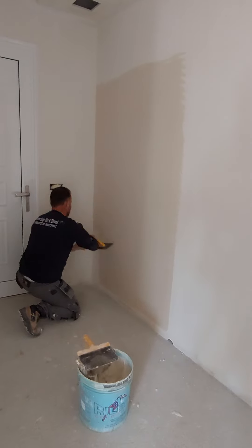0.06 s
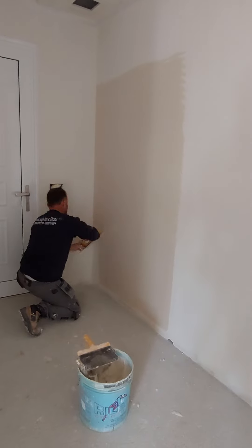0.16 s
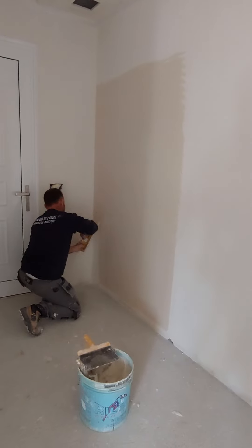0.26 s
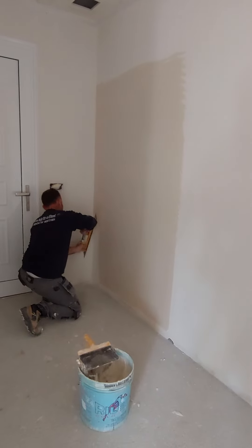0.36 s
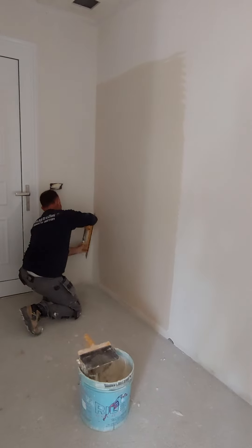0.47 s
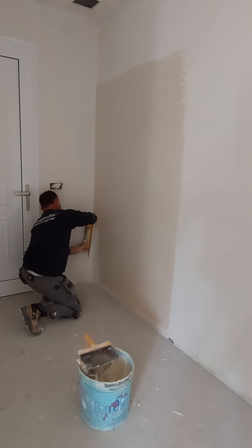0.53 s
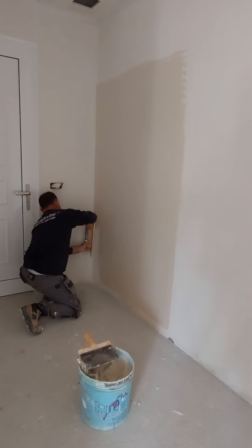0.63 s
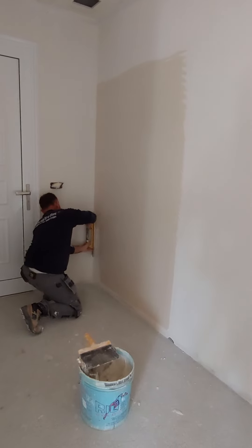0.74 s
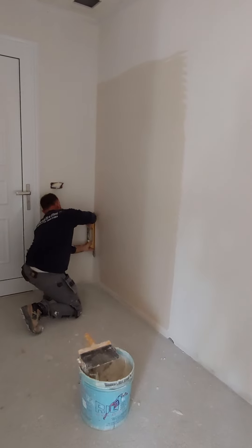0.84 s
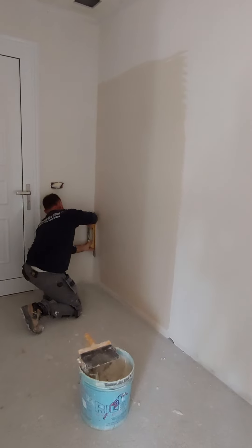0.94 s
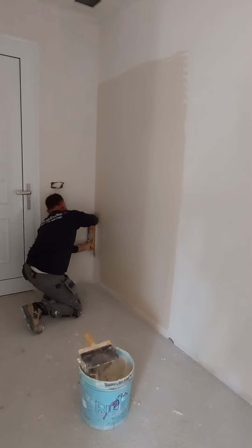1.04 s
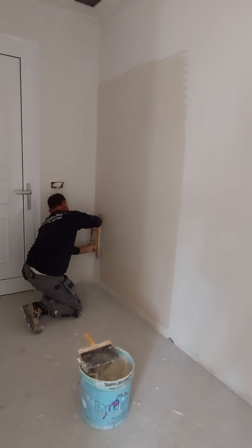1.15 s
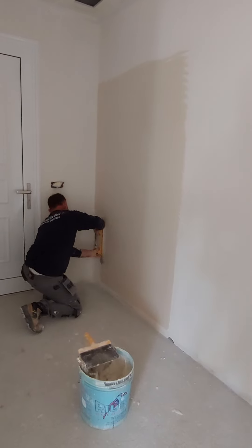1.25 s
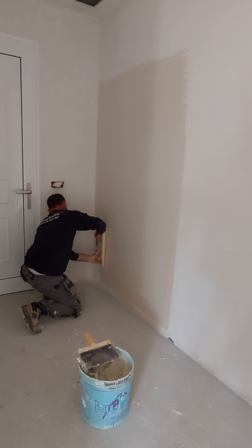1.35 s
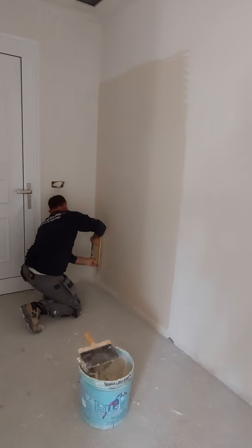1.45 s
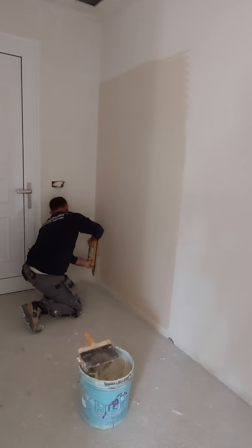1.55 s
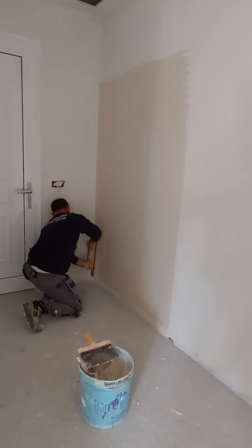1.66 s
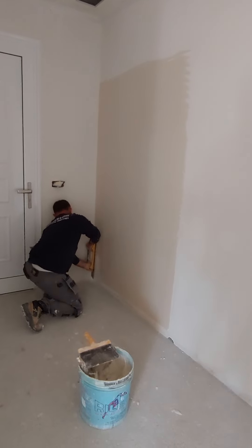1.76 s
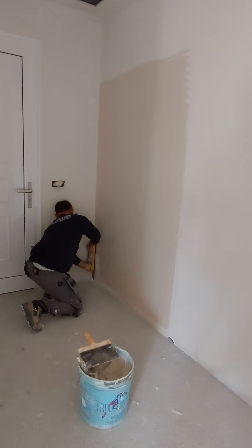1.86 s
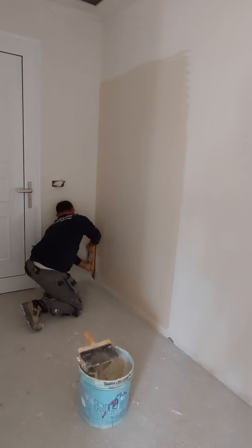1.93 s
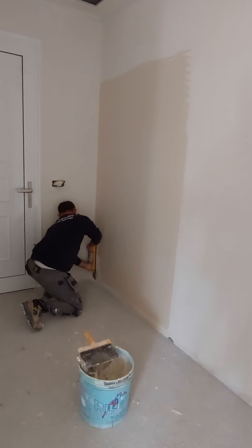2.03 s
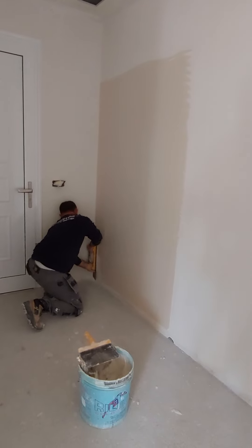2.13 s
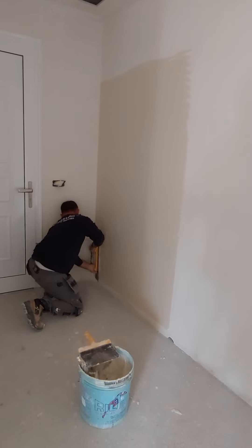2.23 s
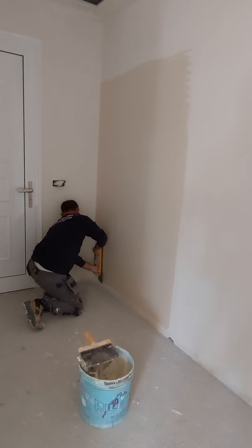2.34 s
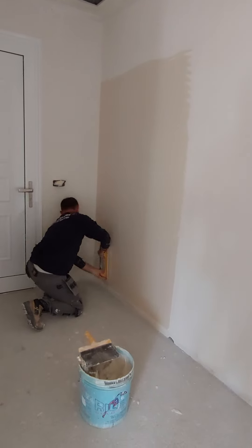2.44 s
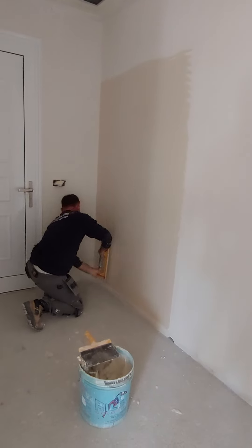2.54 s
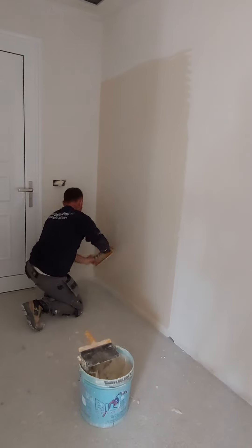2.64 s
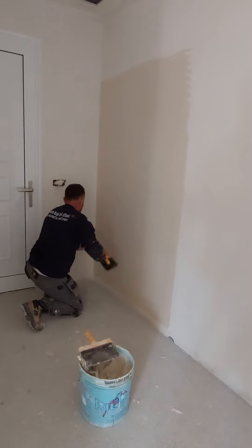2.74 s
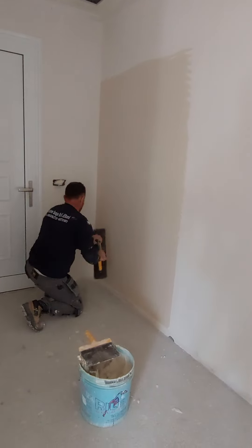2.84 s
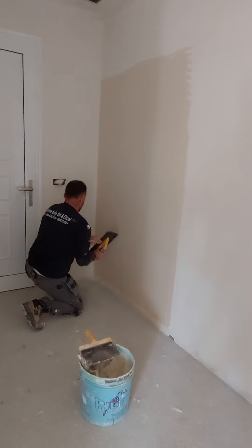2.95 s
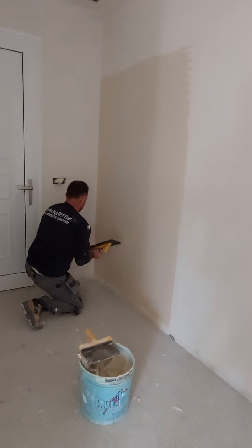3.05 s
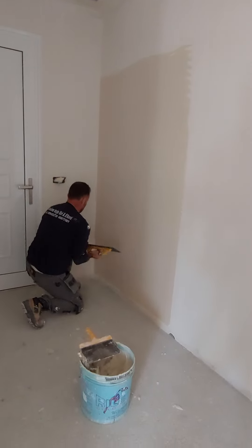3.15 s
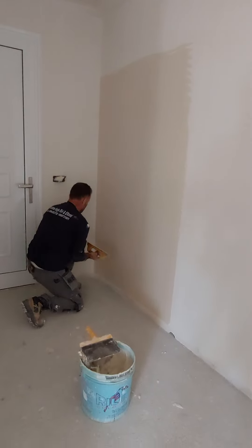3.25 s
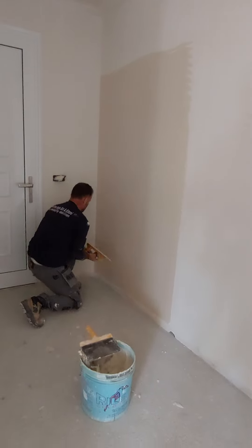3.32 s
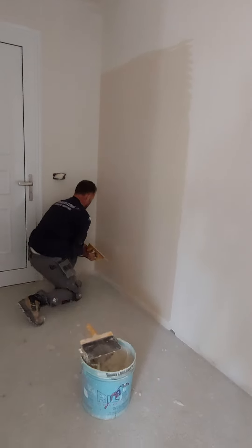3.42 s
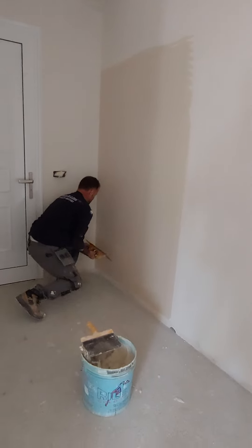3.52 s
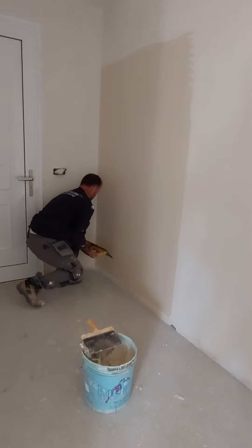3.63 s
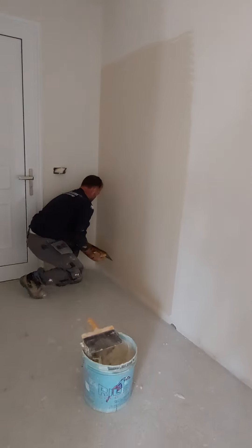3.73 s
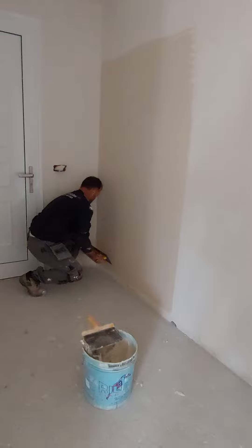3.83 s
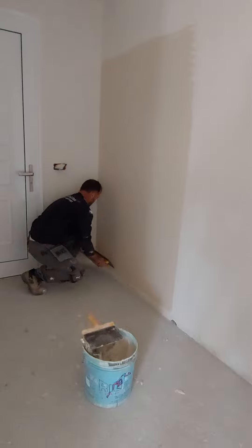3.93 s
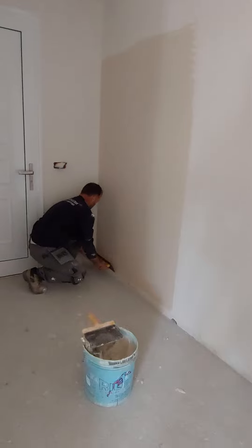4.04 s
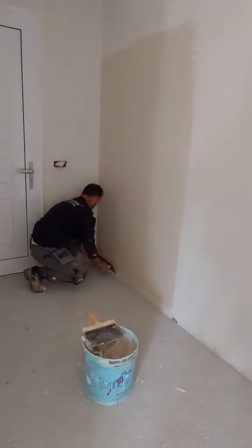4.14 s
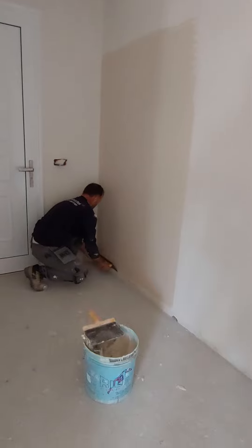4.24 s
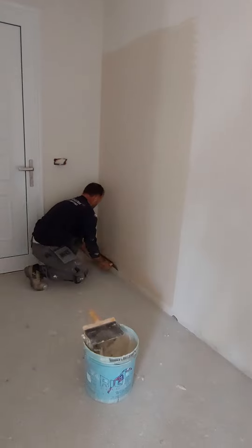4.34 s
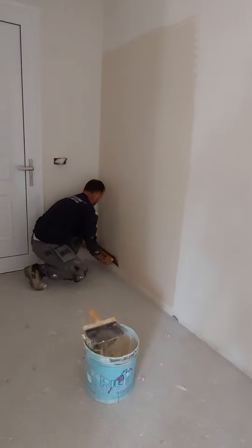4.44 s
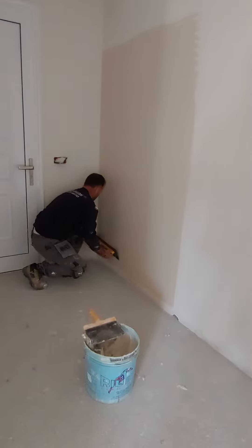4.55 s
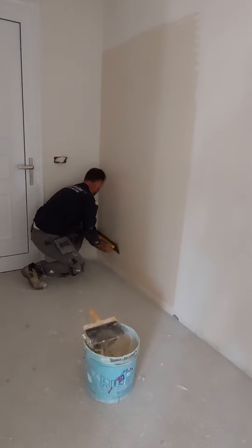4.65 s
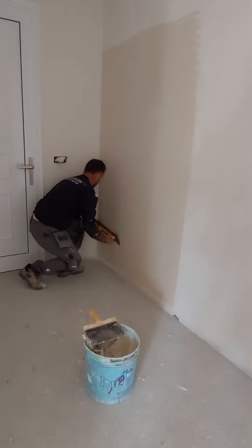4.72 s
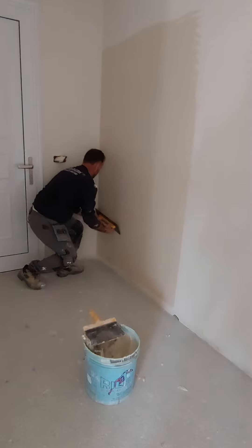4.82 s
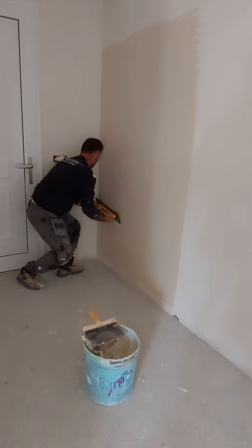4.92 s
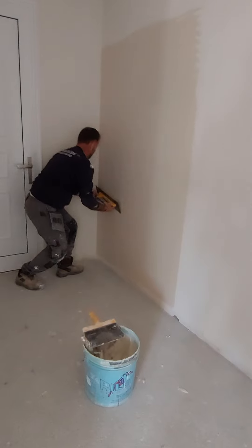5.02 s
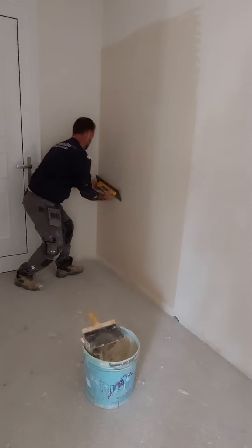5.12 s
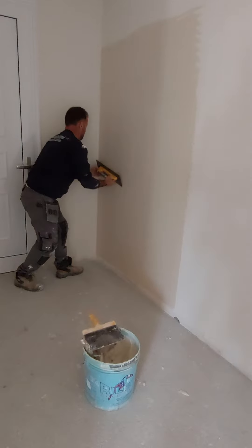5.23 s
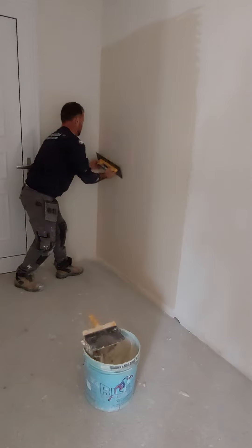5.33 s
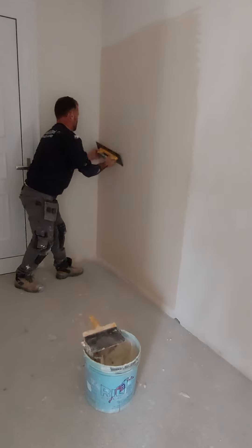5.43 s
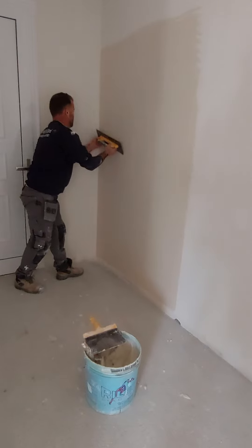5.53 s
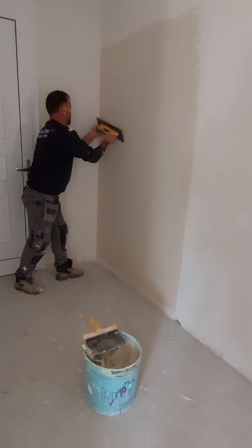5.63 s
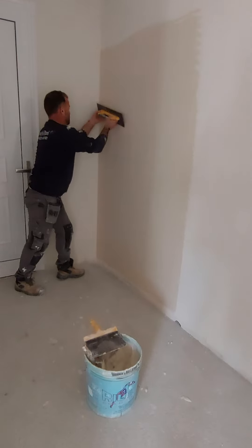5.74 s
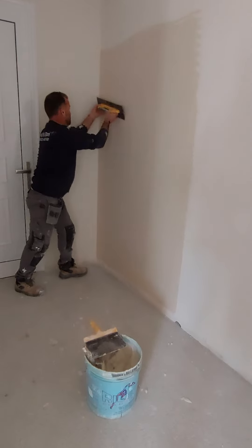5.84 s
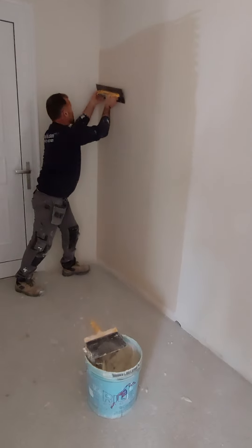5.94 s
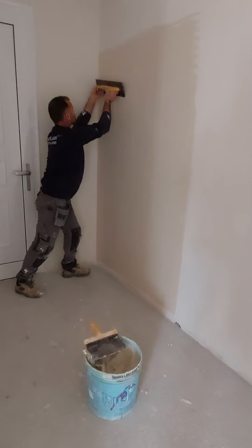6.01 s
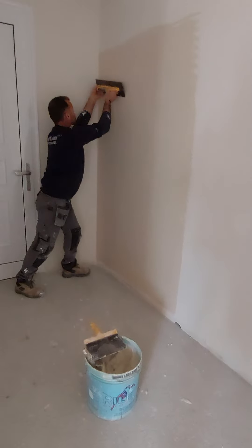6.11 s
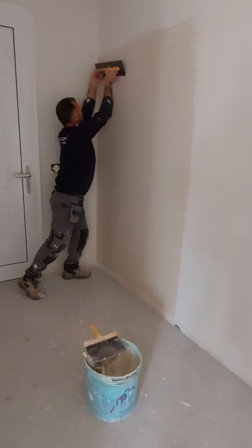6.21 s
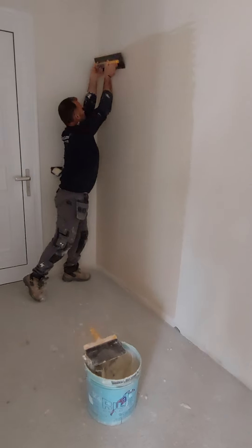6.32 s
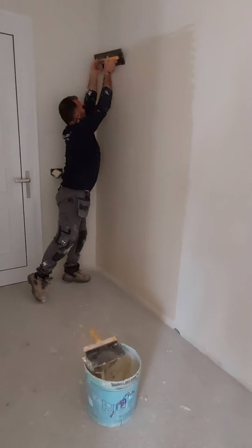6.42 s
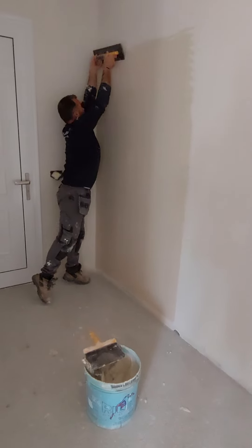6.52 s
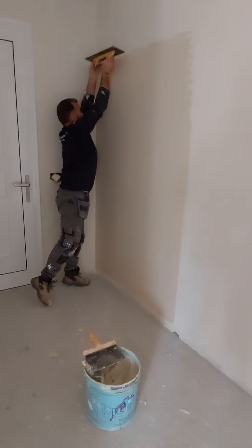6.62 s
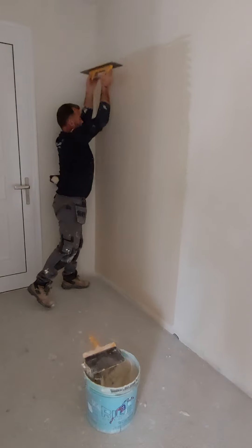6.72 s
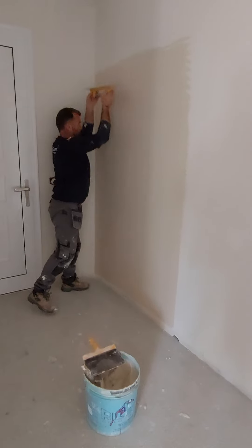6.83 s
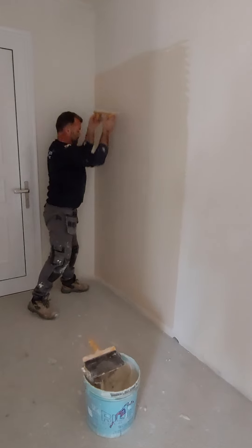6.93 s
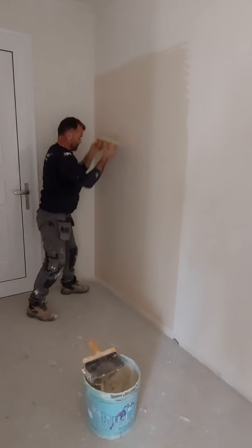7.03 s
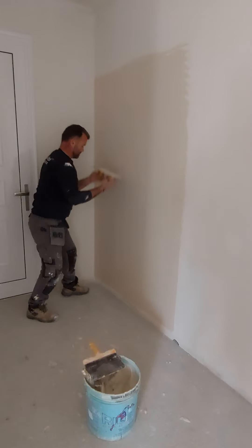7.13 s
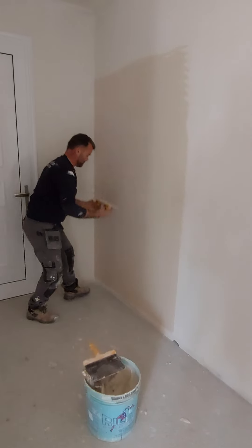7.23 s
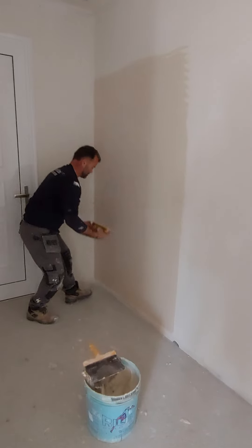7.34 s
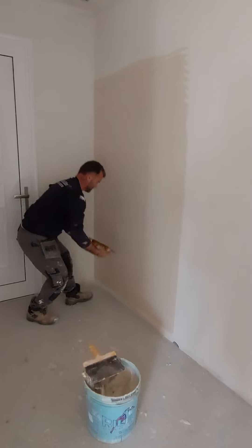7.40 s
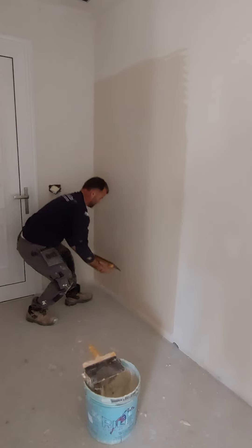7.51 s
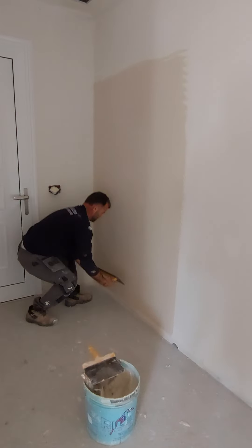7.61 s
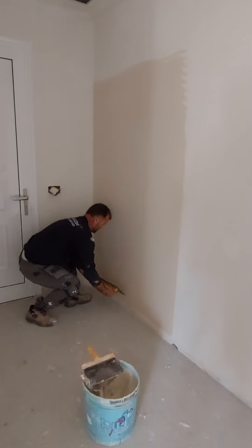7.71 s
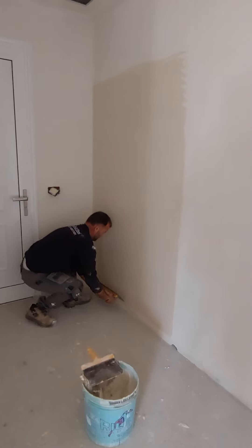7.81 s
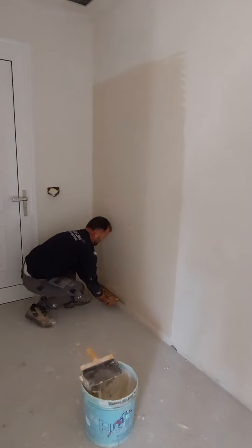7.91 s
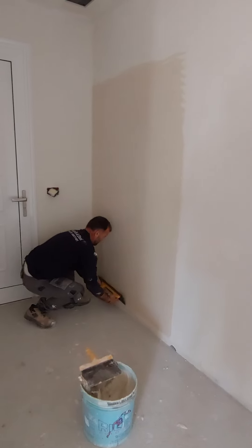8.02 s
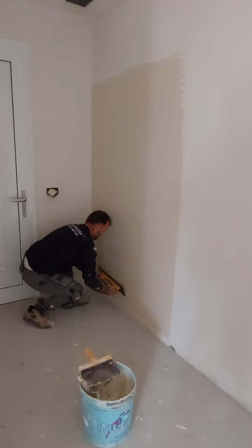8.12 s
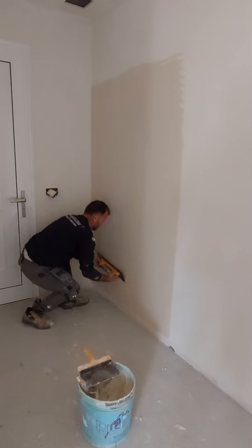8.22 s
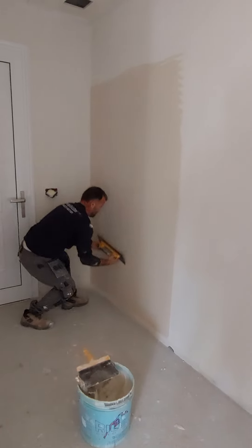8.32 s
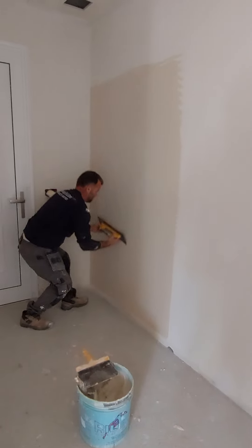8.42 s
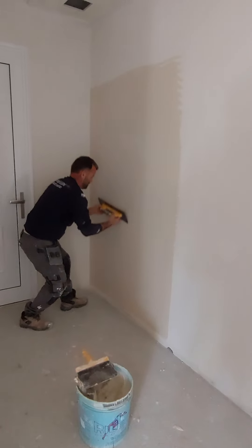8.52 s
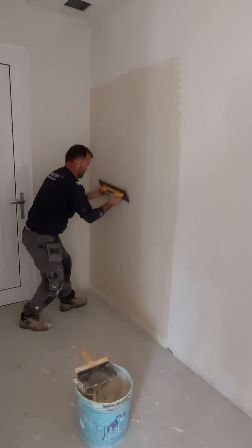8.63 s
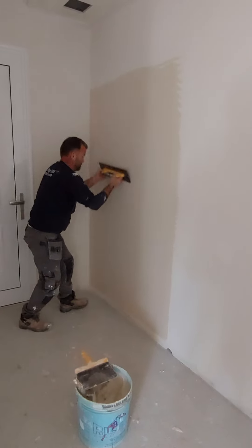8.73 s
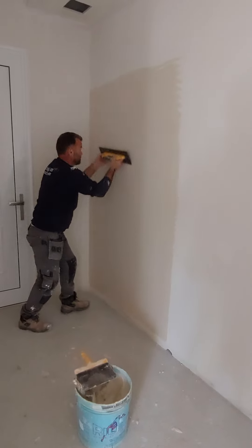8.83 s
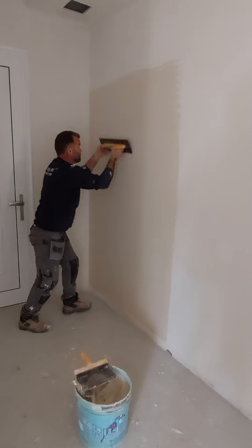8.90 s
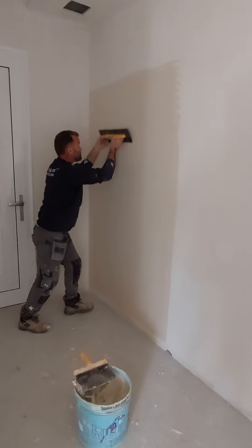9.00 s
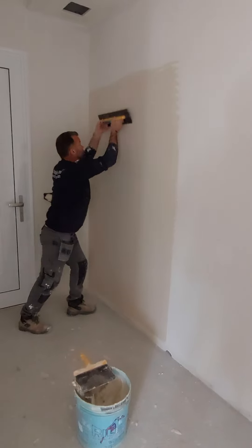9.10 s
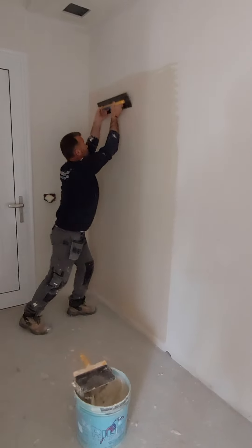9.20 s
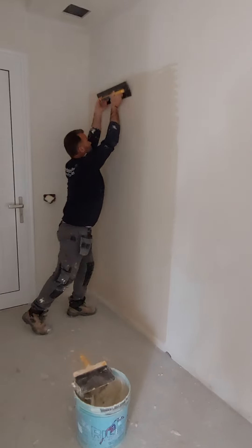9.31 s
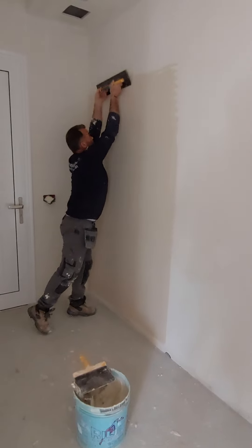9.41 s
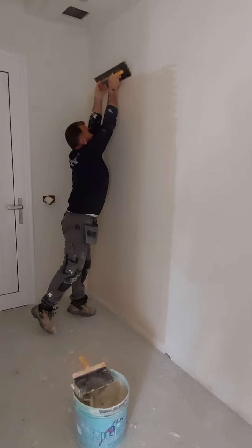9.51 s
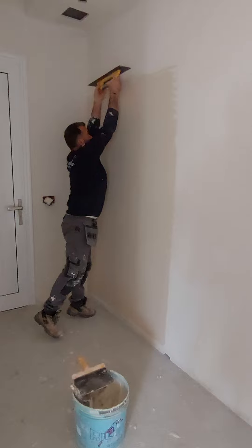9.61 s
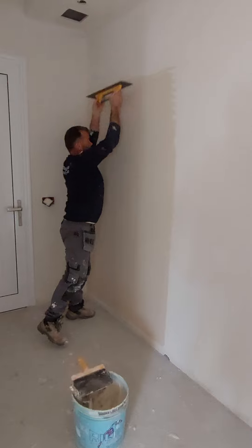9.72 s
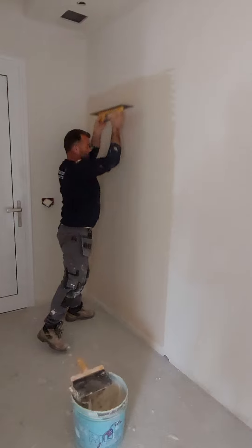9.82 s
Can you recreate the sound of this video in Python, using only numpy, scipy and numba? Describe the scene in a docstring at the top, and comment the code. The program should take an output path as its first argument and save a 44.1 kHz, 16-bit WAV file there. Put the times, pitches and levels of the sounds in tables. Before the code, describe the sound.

In a bare, hard-walled room, a wide steel blade claps against a wall, makes short gritty drags and flicks off wet filler. Shoes and clothes shuffle while a faint bird whistles. A long hollow rasp follows, then a shorter scrape, footsteps, another slap and a rising scrape ending in a loud metallic flick. The microphones are a few metres away, with strong echoes.

```python
"""Shoes and knees shift in a bare, echoing room; a wide steel blade slaps, drags and flicks over wet filler.
A faint bird calls, over a low background that slowly swells. The microphones stand a few metres away.
Blade, wall board and wet paste are filters rung by tiny random slips; so are floor and clothes.
The bird is noise through a narrow moving resonance, and dense echoes make the room."""
import sys
import numpy as np
from scipy import signal
from scipy.fft import rfft, irfft
from scipy.io import wavfile
from numba import njit

SR = 44100
rng = np.random.default_rng(int(sys.argv[2]) if len(sys.argv) > 2 else 0)


def to_wav(sig):
    """Store sig (one row per channel, or 1-D mono) as 16-bit WAV at the path in sys.argv[1].

    Samples outside -1..1 are clipped; the rate is SR.
    """
    pcm = np.clip(np.atleast_2d(sig), -1, 1) * 32767
    pcm = np.round(pcm).astype(np.int16)
    wavfile.write(sys.argv[1], SR, pcm.T)  # frames by channels


N = 434826
T = np.arange(N) / SR
FREQS = np.fft.rfftfreq(N, 1 / SR)
SPOTS = 4  # places along a wide body that sound on their own

# pushes of the blade: start/s, end/s, attack/s, starting effort/dB, effort change/dB per s,
# wall drumming re effort/dB, wet hiss re effort/dB, bend/Hz, starting bend over the broad rasp/dB
PUSHES = [(1.056, 1.317, .02, -36.5, -44.5, 8, -15, 690, -2),
          (2.16, 2.386, .02, -41, -22, -4.5, -38, 697, 3.5),
          (4.363, 6.044, 0.18, -21.5, -1.5, -15.5, -20.5, 585, -4),
          (6.091, 6.615, 0.1, -25.5, -5, -10, -22, 614, 17.5),
          (8.035, 8.254, 0.013, -27, -75, -13, -29.5, 722, 32),
          (8.213, 9.509, 0.39, -40, 2.5, -20.5, -9.5, 491, -7.5)]
# blade set on the wall: t/s, level/dB, landing/s, chatter decay/s, wall drumming re blow/dB,
# wet hiss re blow/dB, bend/Hz, bend over the broad clang/dB
BLADE_SLAPS = [(.833, -29.5, .001, 0.18, -25, -31, 690, 16),
               (.903, -18.5, 0.00016, 0.0051, -15.5, -48.5, 705, 5),
               (1.049, -31, 0.0027, 0.0024, 0.5, -17.5, 690, -11),
               (1.98, -22.5, 0.004, 0.014, -25, -34, 716, 12),
               (2.02, -12, 0.0013, 0.0018, -15, -23, 707, 2),
               (2.426, -37.5, .001, 0.0057, -15, -14.5, 724, -1),
               (4.362, -26, 0.0068, .015, -10.5, -28, 509, 5),
               (8.006, -34.5, 0.00088, 0.0026, -13.5, -29, 680, 19.5),
               (8.024, -24, 0.0031, .025, -14.5, -22.5, 473, 14)]
# blade speeding up, catching or peeling off the paste: peak t/s, level/dB, rise/s, fall/s,
# wall drumming re flick/dB, wet hiss re flick/dB, bend/Hz, bend over the broad clang/dB
BLADE_FLICKS = [(1.392, -20.5, .017, 0.0083, -20.5, -18, 497, -9),
                (2.21, -41, .02, .012, -7, -13, 722, -1.5),
                (2.503, -18.5, 0.0048, 0.0084, -42, -17, 903, 6.5),
                (4.573, -19, 0.032, 0.044, -11.5, -17.5, 659, 9.5),
                (5.051, -18, 0.026, 0.16, -10, -26.5, 636, -17),
                (5.68, -24, .04, 0.026, -21.5, -10, 522, 3.5), (6.64, -25, 0.06, 0.021, -10.5, -18, 523, 5),
                (8.78, -32.5, 0.027, .014, -22.5, -10.5, 544, -17),
                (9.619, -10, .031, 0.009, -25.5, -19.5, 406, 4)]


def amp(db):
    """Decibels to gain."""
    return 10 ** (np.asarray(db) / 20)


def read(points, hz=FREQS):
    """A spectrum table joined on a log-frequency axis."""
    f, value = np.transpose(points)
    return np.interp(np.log(np.maximum(hz, 1)), np.log(f), value)


def body(points, lo, hi, modes=(), size=8192):
    """Minimum-phase response of a broad spectrum plus resonances, with unit power between lo and hi."""
    hz = np.fft.rfftfreq(size, 1 / SR)
    # folding the cepstrum forward puts the energy as early as it can be
    cepstrum = irfft(np.log(amp(read(points, hz))))
    cepstrum[1:size // 2] *= 2
    cepstrum[size // 2 + 1:] = 0
    resonances = sum(amp(db) / (1 + 2j * (hz - f) / width) for f, width, db in modes)
    h = np.exp(rfft(cepstrum)) * (1 + resonances)
    in_band = (hz > lo) & (hz < hi)
    return irfft(h / np.sqrt(np.mean(abs(h) ** 2 * in_band)))


def ring(force, response):
    """Each slip falls on one of several spots of a wide body and rings it; one row per spot."""
    hit = rng.integers(SPOTS, size=N) == np.arange(SPOTS)[:, None]
    shares = (force * hit).astype(np.float32)
    return signal.oaconvolve(shares, response[None].astype(np.float32), axes=1)[:, :N]


@njit
def bandpass(x, hz, width):
    """State-variable resonance whose centre and width can move."""
    y, band, low = np.empty(len(x)), 0., 0.
    for i in range(len(x)):
        g, damping = np.tan(np.pi * hz[i] / SR), width[i] / hz[i]
        v = (band + g * (x[i] - low)) / (1 + g * (g + damping))
        band, low, y[i] = 2 * v - band, low + 2 * g * v, damping * v
    return y


def walk(rate):
    """Random wander with a spread a little under 1: straight lines between rate new values a second."""
    return np.interp(T * rate, np.arange(N // 20), rng.standard_normal(N // 20))


def grit(rate, spread_db):
    """Tiny slips of uneven size, about rate a second, rms 1."""
    slips = (rng.random(N) < rate / SR) * rng.choice([-1, 1], N)
    x = slips * amp(spread_db * np.clip(rng.standard_normal(N), -2, 2))
    return x / np.std(x)


def burst(texture, s, rise, fall):
    """A swell of texture with the energy of a twentieth of a second at 0 dB."""
    x = np.zeros(N)
    near = slice(max(int(s * SR) - SR // 2, 0), int(s * SR) + SR // 2)
    x[near] = texture[near] * np.exp(-np.maximum((s - T[near]) / rise, (T[near] - s) / fall))
    return x * np.sqrt(SR / 20 / np.sum(x[near] ** 2))


def background(level_db=-68, swell_db=1.4):
    """Filtered noise, alike in the bass at both microphones, whose level slowly wanders."""
    # relative spectrum: f/Hz, level/dB
    air_colour = [(25, -3.5), (60, 10.5), (130, 6.5), (400, -4), (1000, -1), (2100, -4.5), (2900, -24.5),
                  (4000, -4.5), (6000, -12.5), (9000, -18), (12000, -9), (16000, -21.5)]
    noise = rng.standard_normal((2, N))
    air = pair(signal.oaconvolve(noise, body(air_colour, 0, SR)[None], axes=1)[:, :N])
    return air * amp(level_db + swell_db * walk(2.1))


def footsteps(heel=0.053):
    """Shoes and knees land with a knock, thud and scuff on the dusty floor."""
    # contacts with the floor: t/s, thud level/dB, decay/s, scuff re thud/dB
    steps = [(.0, -56.5, 0.045, 9), (0.186, -72, .013, 16.5), (0.319, -60.5, 0.03, -4),
             (3.089, -56, .017, -2), (3.218, -61, 0.3, 10), (3.755, -52.5, .007, 6.5),
             (3.848, -50, 0.018, -0.5), (6.987, -39.5, 0.0088, -23.5), (7.041, -42, 0.0021, -8),
             (7.391, -47, 0.14, -3.5), (7.8, -60, .086, -3), (8.03, -42.5, 0.083, -14),
             (9.188, -43.5, 0.03, -28.5)]
    # relative spectrum of the floor's thud: f/Hz, level/dB
    thud_colour = [(30, -26.5), (75, -15), (95, -13), (125, 2.5), (200, -4.5), (300, 1.5), (450, -9),
                   (900, -11), (4000, -62)]
    # relative spectrum of the dusty scuff: f/Hz, level/dB
    scuff_colour = [(100, -50.5), (450, 3.5), (1000, 4), (2200, -2), (4500, -14.5), (7500, -24.5),
                    (9000, -30), (15000, -16.5)]
    dust, weight = grit(2500, 3), grit(1500, 3)
    for s, *_ in steps:
        weight[max(int(s * SR), 0)] += heel * SR / 100  # one-sample knock
    thuds = sum(amp(db) * burst(weight, s, 1 / SR, fall) for s, db, fall, _ in steps)
    scuffs = sum(amp(db + scuff_db) * burst(dust, s, 0.0016, fall) for s, db, fall, scuff_db in steps)
    return ring(thuds, body(thud_colour, 0, SR)) + ring(scuffs, body(scuff_colour, 0, SR))


def clothes():
    """Work clothes brush softly: dense tiny slips that swell and fade."""
    # brushes: peak t/s, level/dB, width/s
    rustles = [(.168, -61.5, .045), (.47, -53, 0.056), (2.75, -62, 0.068), (2.94, -52.5, .039),
               (3.45, -67, 0.17), (3.77, -49, 0.032), (7.03, -61.5, 0.11), (7.289, -58, 0.039),
               (7.8, -60, 0.29)]
    # relative spectrum of the cloth: f/Hz, level/dB
    cloth_colour = [(200, 4.5), (600, 4), (2100, 9), (3000, 5), (5000, 0), (7400, -0.5), (9000, -11),
                    (12000, 3.5), (15700, -3)]
    loud = sum(amp(db) / np.cosh(np.clip((T - s) / width, -20, 20)) for s, db, width in rustles)
    return ring(grit(6500, 4) * loud, body(cloth_colour, 0, SR))


def slaps(coarse, fine, crack=0.032, squelch_s=0.004):
    """Forces on blade, wall and paste: the edge cracks once, then chatters flat while the paste squelches."""
    force = np.zeros((3, N))
    for s, db, landing_s, fall, drum_db, wet_db, *_ in BLADE_SLAPS:
        landing = coarse.copy()
        landing[int(s * SR)] += crack * SR / 100
        blow = amp(db) * burst(landing, s, landing_s, fall)
        force[0] += blow
        force[1] += amp(drum_db) * blow
        force[2] += amp(db + wet_db) * burst(fine, s + squelch_s, squelch_s, fall + squelch_s)
    return force


def drag(judder_db=3.0, patchy_db=1.0, release_s=0.059, drum_follows=2.97, hiss_follows=0.7):
    """Forces of the pushes on blade, wall and paste; the blade judders as it grips and lets go."""
    # drum_follows and hiss_follows: dB for each dB that the effort changes during a push
    force = np.zeros((3, N))
    for start, end, attack, db, db_per_s, drum_db, hiss_db, *_ in PUSHES:
        on = slice(int(start * SR), int((end + release_s) * SR))
        t = T[on] - start
        release = np.clip((end + release_s - T[on]) / release_s, 0, 1)
        contact = np.clip(t / attack, 0, 1) * release
        change = db_per_s * t
        force[0, on] += contact * amp(db + change)
        force[1, on] += np.sqrt(contact) * amp(db + drum_db + drum_follows * change)  # the wall answers first
        force[2, on] += contact * amp(db + hiss_db + hiss_follows * change)
    judder = amp(judder_db * walk(110) + patchy_db * walk(25))
    return force * judder * np.array([grit(1800, 2.9), grit(1200, 3.3), grit(7000, 7.2)])


def flicks(coarse, fine):
    """Forces on blade, wall and paste as the blade speeds up, catches or peels off: slips that swell and fall."""
    force = np.zeros((3, N))
    for s, db, rise, fall, drum_db, wet_db, *_ in BLADE_FLICKS:
        blow = amp(db) * burst(coarse, s, rise, fall)
        force[0] += blow
        force[1] += amp(drum_db) * blow
        force[2] += amp(db + wet_db) * burst(fine, s, rise, fall)
    return force


def bends(sing_db_per_s=14.5):
    """Rows of (s, Hz, dB) for the bending resonance: at both ends of each push, and at each blow."""
    pushed = []
    for start, end, *_, hz, db in PUSHES:
        # as the paste under it runs out, the blade sings more clearly
        pushed += [(start, hz, db), (end, hz, db + sing_db_per_s * (end - start))]
    struck = [(s, hz, db) for s, *_, hz, db in BLADE_FLICKS + BLADE_SLAPS]
    return sorted(pushed), sorted(struck)


def flex(steel, bend, width_hz=40, broad_hz=1000, overtone=2.85, overtone_db=-12):
    """Two bending modes glide from one bend row to the next and take their power from the broad sound."""
    s, hz, db = np.transpose(bend)
    hz, gain = np.interp(T, s, hz), amp(np.interp(T, s, db))
    width = np.full(N, float(width_hz))
    hollow = np.array([bandpass(row, hz, width)
                       + amp(overtone_db) * bandpass(row, overtone * hz, overtone * width)
                       for row in steel.astype(float)])
    return (steel + gain * hollow) / np.sqrt(1 + gain * (gain + 2) * width_hz / broad_hz)


def plastering():
    """Slaps, pushes and flicks all sound through the steel blade, the wall board and the wet paste."""
    # relative spectra of pressed blade, free blade, wall board and wet paste: f/Hz, level/dB
    rasp_colour = [(100, -45), (250, -40.5), (450, -11.5), (700, -2.5), (1000, 3.5), (1550, -2.5),
                   (2300, -8), (3000, -29), (4700, -17), (6000, -31), (7500, -24), (9000, -39.5),
                   (16000, -56.5)]
    clang_colour = [(100, -41.5), (330, -17.5), (450, -2.5), (550, 3), (800, 5.5), (1400, 5), (2200, 0),
                    (3000, -12.5), (4700, -17.5), (6200, -28.5), (7500, -30), (9000, -43), (16000, -31.5)]
    drum_colour = [(30, -36.5), (60, -29), (85, -18.5), (103, -22), (125, -3.5), (170, -3), (330, -3),
                   (450, -3), (800, -37), (3000, -66)]
    hiss_colour = [(150, -14.5), (500, 15), (1200, 9.5), (2400, 11.5), (3300, 7), (4800, 2.5), (6000, -4),
                   (7400, -3), (9000, -13.5), (11500, -2.5), (14000, -2.5), (15700, -1)]
    # blade modes: f/Hz, width/Hz, level over the broad blade sound/dB
    steel_modes = [(461, 6.7, 8), (486, 14, -7), (931, 16, -2), (1213, 150, -11.5), (1514, 10, 3),
                   (1695, 23, -28.5), (2030, 28, 0), (2160, 57, 0), (2360, 180, -5), (2870, 26, 1),
                   (3550, 25, 5.5)]
    # wall board modes: f/Hz, width/Hz, level over the broad drumming/dB
    wall_modes = [(161.3, 13, -2), (226.8, 3.9, 10), (282.4, 22, 5.5), (339.5, 34, 9)]
    coarse, fine = grit(5000, 4), grit(9000, 3)
    rasp, push_drum, push_hiss = drag()
    blows, blow_drum, blow_hiss = slaps(coarse, fine) + flicks(coarse, fine)
    pushed, struck = bends()
    # a free blade rings brighter than one pressed into the paste
    steel = flex(ring(rasp, body(rasp_colour, 500, 2500, steel_modes)), pushed)
    steel += flex(ring(blows, body(clang_colour, 500, 2500, steel_modes)), struck)
    wall = ring(push_drum + blow_drum, body(drum_colour, 100, 400, wall_modes))
    paste = ring(push_hiss + blow_hiss, body(hiss_colour, 11000, 16000))
    return steel + wall + paste


def bird(width_hz=110, sweep_width_hz=1700):
    """Low and high thin notes in turn: filtered noise starts airy, falls and settles into a whistle."""
    # bird notes: t/s, length/s, peak level/dB
    notes = [(3.134, .14, -66.5), (3.36, .16, -66), (3.64, 0.34, -66), (3.89, 0.17, -67), (4.13, .22, -61)]
    # the low and the high note: start f/Hz, end f/Hz
    song = [(4100, 2930), (5500, 5050)]
    hz, width, loud = np.full(N, song[0][0], float), np.full(N, float(width_hz)), np.zeros(N)
    for k, (s, length, db) in enumerate(notes):
        start_hz, end_hz = song[k % 2]
        u = np.clip((T - s) / length, 0, 1)  # progress through the note
        hz = np.where(T > s, end_hz + (start_hz - end_hz) * (1 - u) ** 4, hz)
        width = np.where(T > s, width_hz + sweep_width_hz * (1 - u) ** 2, width)
        loud += amp(db) * np.sqrt(4 * u * (1 - u))
    airy = bandpass(rng.standard_normal(N), hz, width)
    tone = bandpass(airy, hz, width) / np.sqrt(width)  # equal power at any width
    return loud * tone / np.std(tone)


def pair(two):
    """Two unrelated signals as two close microphones hear them: alike in the bass."""
    # likeness of the two microphones: f/Hz, correlation (1 alike, 0 unrelated, below 0 opposed)
    likeness = [(25, .3), (60, 0.82), (120, 0.56), (250, 0.83), (500, 0.51), (1000, -0.2), (2000, 0.026),
                (5000, -0.013)]
    mid, side = rfft(two)
    alike = np.clip(read(likeness, np.linspace(0, SR / 2, len(mid))), -1, 1)
    mid, side = mid * np.sqrt((1 + alike) / 2), side * np.sqrt((1 - alike) / 2)
    return irfft(np.array([mid + side, mid - side]))


def echo_pattern(direct_db=-15, early_db=3, early_s=.035, echo_rate=3500):
    """Bare walls: a weak direct sound, strong early echoes, then a dense tail that loses its treble first."""
    # room decay: f/Hz, time to fall 60 dB/s
    room_decay = [(100, 0.46), (250, 1.6), (500, 1.09), (1000, 1.15), (2000, 1.02), (4000, 0.86),
                  (7500, 0.55), (12000, 0.38), (16000, 0.23)]
    t = T[:5 * SR // 4]
    density = np.clip(echo_rate / SR * (1 + (t / early_s) ** 2), 0, 1)
    sparse = rng.standard_normal((2, len(t))) * (rng.random((2, len(t))) < density)
    echoes = sparse / np.sqrt(density)
    hz, when, z = signal.stft(echoes, SR, nperseg=256)
    decay = amp(-60 * when / read(room_decay, hz)[:, None])
    decay *= 1 + amp(early_db) * np.exp(-when / early_s)
    # equal echo energy in every band
    decay /= np.sqrt(np.sum(decay ** 2, axis=1, keepdims=True) * when[1] * SR)
    response = pair(signal.istft(z * decay, SR)[1])
    response = response[:, :9 * SR // 8]  # the tail has died away by then
    response[:, 0] += amp(direct_db)
    return response


def room(spots):
    """Every spot reaches the microphones by its own pattern of echoes."""
    return sum(signal.oaconvolve(x[None].astype(np.float32), echo_pattern().astype(np.float32), axes=1)[:, :N]
               for x in spots)


def scene():
    """The work and the bird echo in the room over a faint, slowly swelling background."""
    spots = footsteps() + clothes() + plastering()
    spots[0] += bird()
    return room(spots) + background()


def record(dry):
    """The left microphone is shaded from the treble; the top is cut."""
    # balance of the microphone pair: f/Hz, left minus right/dB
    ears = [(100, 0.93), (200, -3), (400, -1), (800, -1), (2400, -3), (4400, -5), (8100, -10.5),
            (15000, -15)]
    lean = amp(read(ears))
    gains = np.array([lean, np.ones_like(lean)]) * np.sqrt(2 / (1 + lean ** 2))  # total power kept
    heard = irfft(rfft(dry) * gains, N)
    top_cut = signal.ellip(10, .2, 70, 15900, fs=SR, output="sos")  # order, ripple/dB, stop/dB, f/Hz
    return signal.sosfilt(top_cut, heard)


dry = scene()
out = record(dry)
to_wav(out)
```